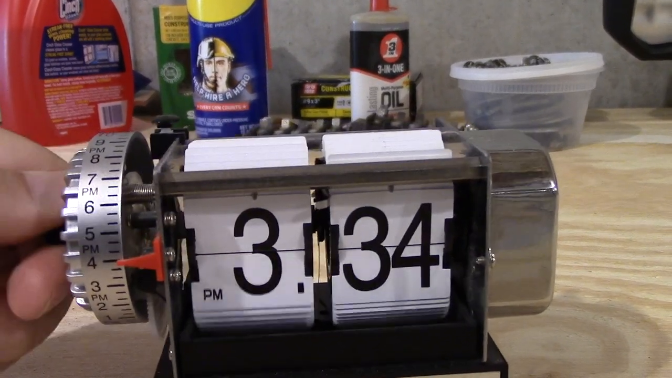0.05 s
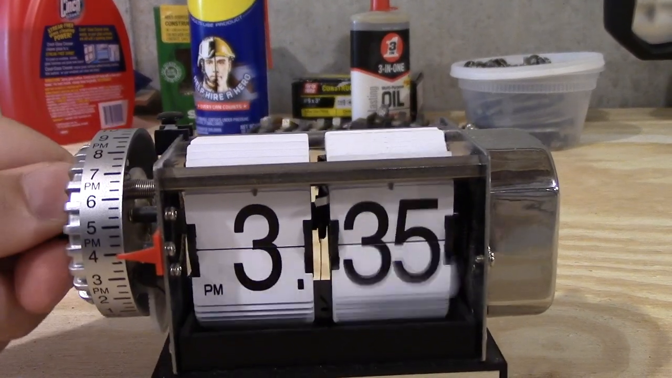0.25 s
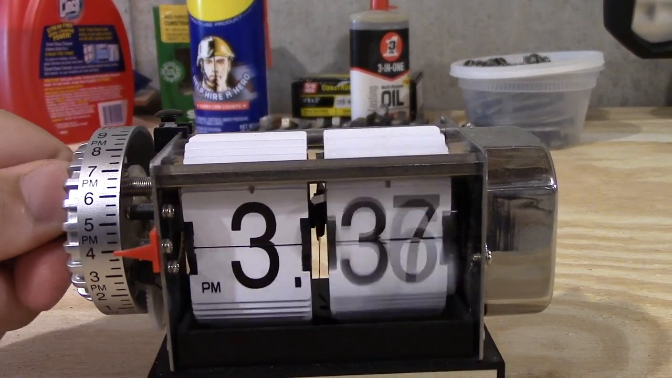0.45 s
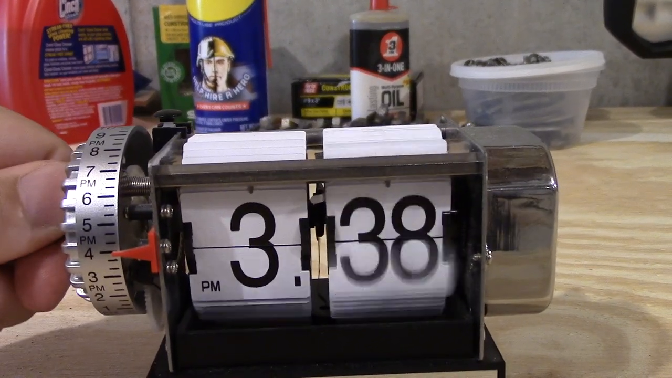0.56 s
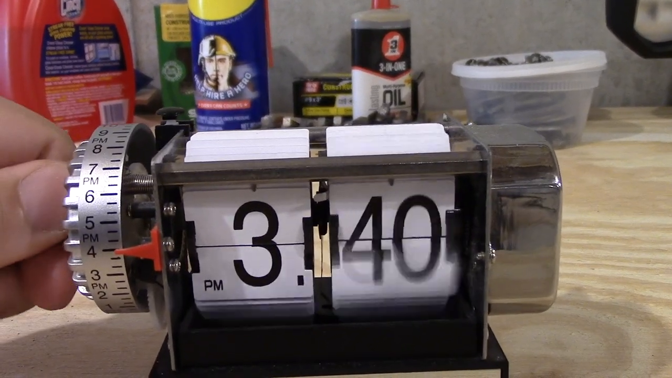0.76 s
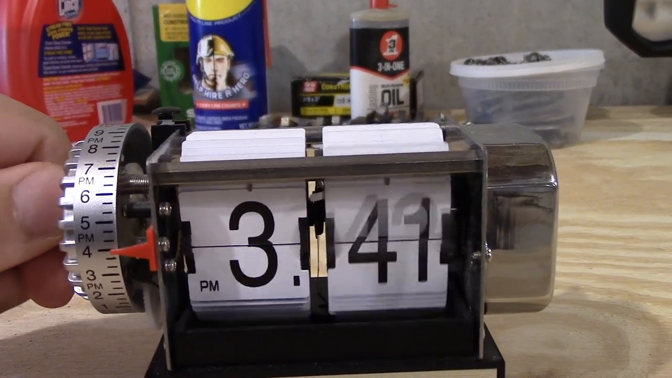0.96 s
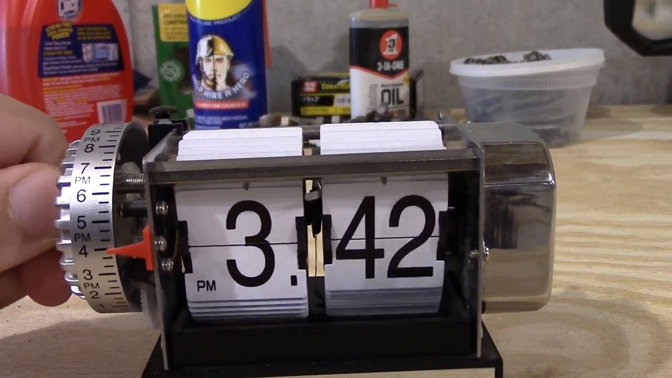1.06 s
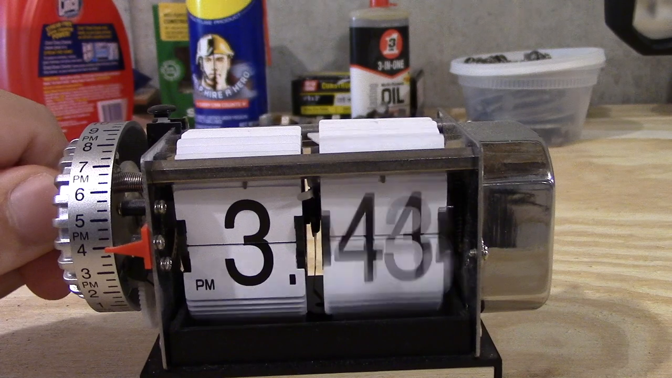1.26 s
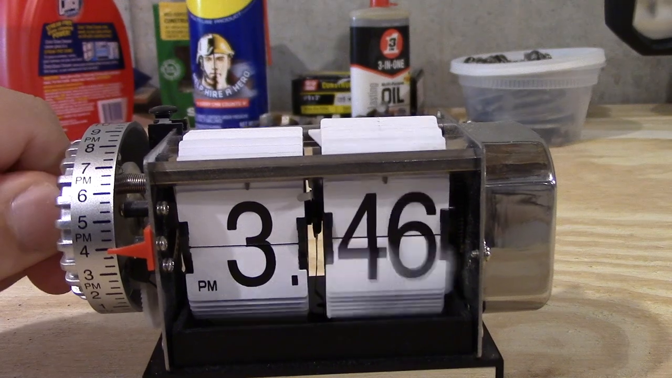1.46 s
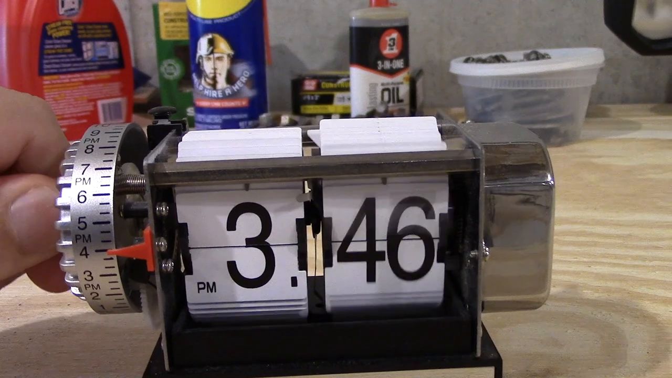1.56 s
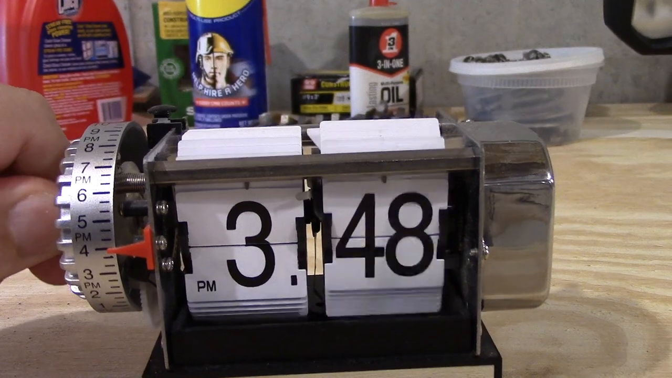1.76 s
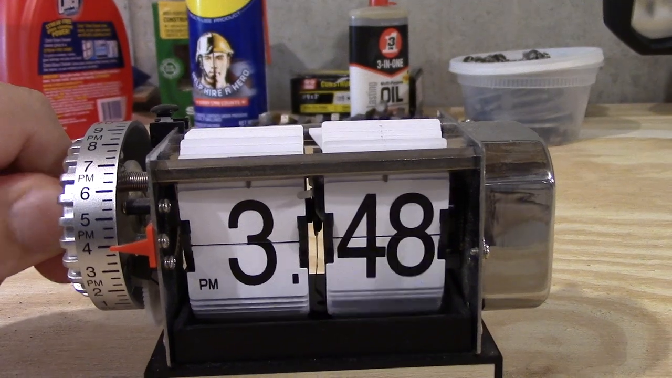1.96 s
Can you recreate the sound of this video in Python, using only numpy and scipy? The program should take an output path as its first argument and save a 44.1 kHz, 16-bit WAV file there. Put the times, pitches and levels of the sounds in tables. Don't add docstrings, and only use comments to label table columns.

```python
import sys
import numpy as np
from scipy import signal
from scipy.fft import rfft, irfft, next_fast_len
from scipy.io import wavfile
from scipy.ndimage import uniform_filter1d

SR = 44100
rng = np.random.default_rng(int(sys.argv[2]) if len(sys.argv) > 2 else 0)


def to_wav(sig):
    pcm = np.clip(np.atleast_2d(sig), -1, 1) * 32767
    pcm = np.round(pcm).astype(np.int16)
    wavfile.write(sys.argv[1], SR, pcm.T)


def linear_from_db(decibels):
    return 10 ** (np.asarray(decibels, float) / 20)


N = 90405


def unit(x):
    return x / np.sqrt(np.mean(x ** 2) + 1e-20)


def along(curve, hz):
    f, value = np.transpose(curve)
    return np.interp(np.log(hz + 1), np.log(f + 1), value)


def filtered(x, response):
    n = x.shape[-1]
    m = next_fast_len(n + 4096)
    return irfft(rfft(x, m) * response(np.fft.rfftfreq(m, 1 / SR)), m)[..., :n]


def add(out, s, sound, db):
    loudest = np.sqrt(np.abs(uniform_filter1d(sound[0] ** 2, size=66)).max())
    out[:, round(s * SR):][:, :sound.shape[1]] += linear_from_db(db) * sound / loudest


def aims(modes):
    detune, scatter_db = .007, 1.4
    spread, spread_hz = .57, 9500
    hz, width, db = np.transpose(modes)
    a, b, c = rng.standard_normal((3, len(modes)))
    turn = np.exp(.5j * spread * c * np.minimum(hz / spread_hz, 1) ** 2)
    return hz * (1 + detune * a), width, linear_from_db(db + scatter_db * b), np.array([turn, turn.conj()])


def lumpy_db(depth_db, size):
    return depth_db * unit(uniform_filter1d(rng.standard_normal(4096), size=size))


def strikes(rows, modes, attack, t60, grain_db, push, rattle_db, gain_db, order=1):
    rattle_t60, rattle_hz, rattle_grain_db = .089, 9000, 1.2
    out, t = np.zeros((2, N + SR)), np.arange(4096) / SR
    for s, hold, db in rows:
        rise = np.minimum(t / attack, 1) ** 2
        fall = np.maximum(t - attack - hold, 0)
        noise = rise * linear_from_db(lumpy_db(grain_db, 24)) * rng.standard_normal((2, len(t)))
        friction = noise[0] * linear_from_db(-60 * fall / t60)
        rattle = noise[1] * linear_from_db(lumpy_db(rattle_grain_db, 130) + rattle_db - 60 * fall / rattle_t60)
        rattle = filtered(rattle, lambda f: 1 / (1 + 1j * f / rattle_hz))
        single_push = push * np.exp(-(2 * (t - attack) / attack) ** 2)

        hz, width, gain, turn = aims(modes)
        gain = gain * width * (-1) ** np.arange(len(gain))

        def body(f):
            resonances = 1j * f / (hz[:, None] ** 2 - f * f + 1j * f * width[:, None])
            return (turn ** (1 / order) @ (gain[:, None] * resonances)) ** order

        add(out, s, filtered(friction + rattle - single_push, body), db + gain_db)
    return out[:, :N]


def blows(table, late=0, loss_db=0):
    return [(s + late, 0, db + loss_db) for s, db, *_ in table]


# f/Hz, level/dB
HUM_TONE = [(15, -81.5), (25, -23), (160, -5), (394, -12.5), (1670, -26), (2630, -23), (6500, -31.5),
            (15000, -47.5)]
# t/s, level/dB
HUM_SWELL = [(0.0, -51), (0.43, -47), (2.05, -51)]
# f/Hz, likeness [clipped to 0 to 1]
ALIKE = [(60, -0.31), (240, 0.45), (950, -0.18), (3770, -1.3), (15000, 1)]


def hum():
    gain_db, top_hz = 1, 15200
    z = signal.stft(rng.standard_normal((2, N)), nperseg=1024)[2]
    patches = uniform_filter1d(rng.standard_normal(z.shape[1:]), size=4, axis=0)
    patches = uniform_filter1d(patches, size=4, axis=1)
    pair = signal.istft(z * linear_from_db(3.46 * unit(patches)), nperseg=1024)[1][:, :N]

    def mid_side(hz):
        turn = np.arccos(np.clip(along(ALIKE, hz), 0, 1)) / 2
        return linear_from_db(along(HUM_TONE, hz)) * (hz < top_hz) * np.array([np.cos(turn), np.sin(turn)])

    mid, side = filtered(pair, mid_side)
    s, db = np.transpose(HUM_SWELL)
    swell = linear_from_db(gain_db + np.interp(np.arange(N) / SR, s, db))
    return swell * unit(np.array([mid + side, mid - side]))


# f/Hz, t60/s
ROOM_T60 = [(300, 0.44), (3000, 0.65), (7000, 0.23), (11000, 0.17), (16000, 0.063)]


def room(x):
    out = np.zeros((2, N + SR))
    for a in range(0, N, 4096):
        hz, t, z = signal.stft(rng.standard_normal((2, SR // 4)), SR, nperseg=256)
        decay = linear_from_db(-60 * t / along(ROOM_T60, hz)[:, None])
        tail = signal.istft(z * decay, SR, nperseg=256)[1]
        wet = signal.fftconvolve(x[None, a:a + 4096], tail / np.linalg.norm(tail[0]), axes=1)
        out[:, a + 100:a + 100 + wet.shape[1]] += wet
    return out[:, :N]


# t/s, length/s, level/dB
DRONES = [
    (.7, 0.28, -50.5),
]


def drone():
    out = np.zeros((2, N))
    for s, length, db in DRONES:
        t = np.arange(round(length * SR)) / SR
        tone = np.hanning(len(t)) ** .5 * np.sin(2 * np.pi * 206.2 * t)
        out[:, round(s * SR):][:, :len(t)] += linear_from_db(db) * tone
    return out


# t/s, length/s, level/dB
BUMPS = [
    (.038, .002, -44),
    (1.484, .008, -39),
    (1.915, .002, -45),
    (1.947, .006, -41),
    (1.975, .008, -43),
    (2.011, .002, -45),
]
# f/Hz, width/Hz, level/dB
BENCH = [(150, 140, 0), (330, 250, -4)]


def bumps():
    return strikes(BUMPS, BENCH, attack=.001, t60=.008, grain_db=2, push=0, rattle_db=-17, gain_db=0,
                   order=2)


# t/s, length/s, level/dB
RUBS = [
    (0, .034, -56),
    (.878, .006, -44),
    (1.746, .008, -47),
]
# f/Hz, width/Hz, level/dB
DIAL = [(2500, 500, -2), (5500, 500, -2), (7100, 250, 0), (8800, 900, -9), (12000, 2000, -22)]


def rubs():
    return strikes(RUBS, DIAL, attack=.002, t60=.015, grain_db=2, push=0, rattle_db=-30, gain_db=0)


# t/s, length/s, level/dB
TOUCHES = [(.0348, 0.0016, -41), (1.1135, 0.0013, -34), (1.2485, 0.0012, -33), (1.568, .003, -34.5),
           (1.7045, 0.0024, -31.5), (1.346, 0.0093, -36), (1.4355, 0.0025, -37)]
# f/Hz, width/Hz, level/dB
CATCH = [(1080, 45, -4), (2520, 130, -6), (3570, 200, -2), (4650, 300, -13), (5960, 110, 1),
         (8700, 350, -10), (12000, 700, -20)]


def touches():
    return strikes(TOUCHES, CATCH, attack=.000079, t60=.012, grain_db=7, push=4.8, rattle_db=-12,
                   gain_db=.2)


# t/s, length/s, level/dB
SCRAPES = [(0.241, 0.0093, -20), (0.3555, 0.015, -25.5), (0.4655, 0.0093, -19), (0.549, 0.011, -22.5),
           (0.6718, 0.0046, -16.5), (0.7535, 0.0088, -22), (0.8375, 0.02, -27.1), (0.9745, 0.011, -22.5),
           (1.1395, 0.0034, -30), (1.2735, 0.003, -33), (1.3508, 0.0095, -19.5), (1.4432, 0.0089, -24),
           (1.5835, 0.011, -21), (1.7045, 0.01, -26.5), (1.7215, 0.005, -33)]
# f/Hz, width/Hz, level/dB
SPRING = [(1620, 1800, -12.5), (2333, 590, -7.5), (3380, 500, -12.5), (5750, 720, -7), (6700, 330, -6),
          (8817, 750, -0.5), (10020, 470, -5.5), (12420, 590, -4), (14870, 230, -8.5)]
# f/Hz, width/Hz, level/dB
GRIT = [(2470, 1200, 1), (4580, 2000, -2.5), (6240, 1090, 0.5), (7910, 3400, -10), (10500, 3000, -15.5),
        (14300, 2500, -12)]


def scrapes():
    steel = strikes(SCRAPES, SPRING, attack=.0006, t60=.011, grain_db=2, push=0, rattle_db=-34,
                    gain_db=0, order=2)
    grit = strikes(SCRAPES, GRIT, attack=.0012, t60=.022, grain_db=2.2, push=0, rattle_db=-11,
                   gain_db=-12.5)
    return steel + grit


# t/s, level/dB
SNAPS = [(0.2476, -17), (0.2486, -19), (0.3626, -21), (0.365, -32), (0.4717, -18.1), (0.4743, -20.5),
         (0.5505, -32), (0.553, -19.6), (0.5562, -40), (0.6769, -16.5), (0.757, -24), (0.7598, -34),
         (0.8458, -25.5), (0.9819, -21), (1.1386, -25.5), (1.141, -21.5), (1.1439, -34), (1.2728, -34.5),
         (1.275, -24), (1.3557, -27.5), (1.3582, -21.5), (1.359, -22), (1.452, -36), (1.4538, -22.5),
         (1.4548, -26.5), (1.5877, -44), (1.5898, -15), (1.7266, -20.5)]
# f/Hz, width/Hz, level/dB
TWANG = [(5850, 250, -2), (6520, 270, -6.5), (7500, 670, -3.5), (8980, 264, 1), (10900, 370, -2),
         (12400, 700, -10), (13400, 3600, -14), (14900, 590, -16)]


def snaps():
    return strikes(blows(SNAPS), TWANG, attack=.00006, t60=.003, grain_db=1.5, push=4, rattle_db=-28,
                   gain_db=1)


# t/s, level/dB
TOCKS = [(0.2453, -35), (0.2475, -27.5), (0.2505, -44), (0.3627, -24.5), (0.3648, -45), (0.3668, -41),
         (0.4722, -31), (0.4743, -28.5), (0.5535, -32), (0.555, -25), (0.5585, -35.9), (0.6748, -25.5),
         (0.677, -61), (0.6792, -36.0), (0.7568, -25.5), (0.7588, -59), (0.7603, -30), (0.8437, -28.5),
         (0.8458, -45), (0.8478, -30), (0.9797, -51), (0.9818, -36), (0.9835, -26.5), (1.1387, -24.5),
         (1.1418, -39), (1.144, -32), (1.1452, -43), (1.2728, -32.5), (1.2748, -27), (1.2778, -29),
         (1.356, -23.5), (1.358, -34), (1.3605, -31.5), (1.452, -24.5), (1.454, -37.5), (1.5879, -25),
         (1.5897, -29.5), (1.7268, -24), (1.7295, -32)]
# f/Hz, width/Hz, level/dB
FRAME = [(350, 570, -8.5), (895, 500, -4), (1750, 130, 3), (2460, 450, -3.5), (3570, 480, -5.5)]


def tocks():
    thuds = TOCKS + [(s, thud_db) for s, _, thud_db in KNOCKS]
    return strikes(blows(thuds), FRAME, attack=.00012, t60=.006, grain_db=1.5, push=5, rattle_db=-16,
                   gain_db=-1)


# t/s, tick level/dB, thud level/dB
KNOCKS = [(0.2788, -30, -27.5), (0.3952, -26, -28), (0.506, -35, -32.5), (0.5906, -38, -32.5),
          (0.7082, -30, -26), (0.7938, -32, -37), (0.8839, -33.5, -26.5), (1.0184, -31.5, -28),
          (1.168, -26.5, -25.5), (1.3878, -44, -30), (1.4837, -25.5, -25), (1.7585, -25.5, -25.5)]
# f/Hz, width/Hz, level/dB
PANEL = [(4200, 300, 0.5), (6260, 590, 1), (7500, 930, -4), (10900, 700, -4), (11100, 900, -8.5),
         (13400, 1130, -6.5), (14800, 1200, -7.5)]


def knocks():
    return strikes(blows(KNOCKS), PANEL, attack=.0001, t60=.011, grain_db=2.5, push=1.45,
                   rattle_db=-16.5, gain_db=1.3)


def puffs():
    out, u = np.zeros(N + SR), np.arange(4096) / SR / .00305
    for s, _, db in SLAPS:
        out[round(s * SR):][:len(u)] -= linear_from_db(db) * u * (1 - u / 6) * np.exp(1 - u)
    return out[:N]


def rebounds():
    return strikes(blows(SLAPS, .0145, -36), STACK[4:5], attack=.001, t60=.008, grain_db=2, push=0,
                   rattle_db=-17, gain_db=0)


# f/Hz, width/Hz, level/dB
LOOSE = [(1930, 1200, -14), (2604, 95, -3.5), (3380, 480, -2.5), (4650, 230, 1), (6130, 1200, -1.5),
         (9530, 4700, -7.5), (10370, 1300, -2.5), (14100, 3500, -7), (14480, 630, -13.5)]


def clatter():
    return strikes(blows(SLAPS, loss_db=-9.5), LOOSE, attack=.0015, t60=.02, grain_db=1.5, push=0,
                   rattle_db=-15, gain_db=-8)


# t/s, slap level/dB, air pull level/dB
SLAPS = [(0.2843, -1, -41.5), (0.3979, -0.5, -47), (0.5111, -2.5, -42), (0.61, -2, -42), (0.7151, -2, -35),
         (0.7965, -2.5, -43.5), (0.9091, -2.5, -39.5), (1.05, -2, -42.5), (1.1892, -4, -43.5),
         (1.306, -1.5, -49), (1.3811, -2.5, -51.5), (1.5014, -0.5, -59), (1.6174, -1, -49), (1.777, 0, -53)]
# f/Hz, width/Hz, level/dB
STACK = [(884, 3500, -45), (2486, 146, -27.5), (3636, 217, -16.5), (4730, 420, -10.5), (6261, 308, 3),
         (5274, 200, -17), (7690, 446, -2.5), (8400, 318, -4.5), (9780, 280, -6.5), (10985, 447, 7),
         (11740, 150, -24.5), (12400, 320, -14.5), (12960, 810, 6), (14420, 387, -1)]


def slaps():
    rise_s, lead_s, gain_db = .00064, .00062, -6
    out, t = np.zeros((2, N + SR)), np.arange(2048) / SR
    swell = (1 - np.exp(-(t / rise_s) ** 2)) ** 2
    for s, db, _ in SLAPS:
        hz, width, gain, turn = aims(STACK)
        start = np.exp(2j * np.pi * rng.random(len(hz)))
        rings = (gain * start)[:, None] * np.exp((2j * hz[:, None] - width[:, None]) * np.pi * t)
        add(out, s - lead_s, np.real(turn @ rings) * swell, db + gain_db)
    return out[:, :N]


# f/Hz, angle/rad
LEAD = [(100, 0), (8000, -.05), (11000, -.5), (12400, .4), (14500, -.4)]
# f/Hz, level/dB
LEAN = [(100, -1), (4000, -.4), (10000, -.6), (15000, -2.5)]


def scene():
    hand = drone() + bumps() + rubs()
    tiles = touches() + scrapes() + snaps() + tocks() + knocks() + rebounds() + clatter() + slaps()
    clock = hand + tiles
    sign = np.array([[.5], [-.5]])
    near = filtered(clock, lambda hz: linear_from_db(sign * along(LEAN, hz)) * np.exp(1j * sign * along(LEAD, hz)))
    return hum() + linear_from_db(-32) * room(clock.mean(0)) + puffs() + near


def top_cut(x):
    return signal.sosfilt(signal.butter(12, 16870, fs=SR, output="sos"), x)


def record(dry):
    drive_db, knee = .5, 7.6
    top_hz, top_width_hz = 16200, 330
    x = linear_from_db(drive_db) * dry
    x = x / (1 + np.abs(x) ** knee) ** (1 / knee)
    mix = filtered(x, lambda hz: .5 - .5 * np.tanh((hz - top_hz) / top_width_hz))
    return top_cut(mix)


dry = scene()
out = record(dry)
to_wav(out)
```